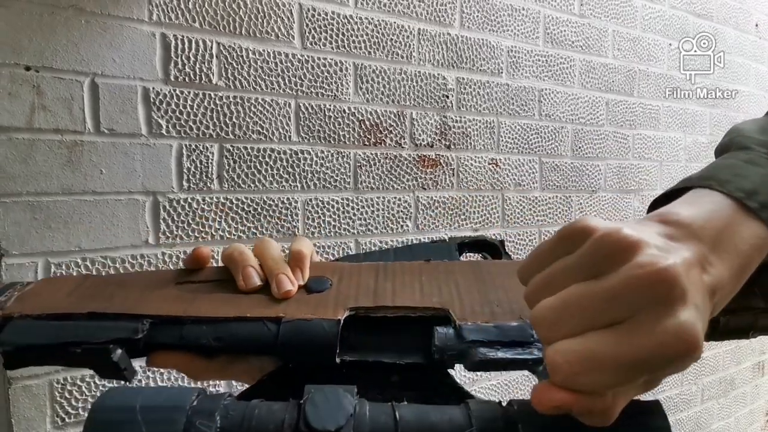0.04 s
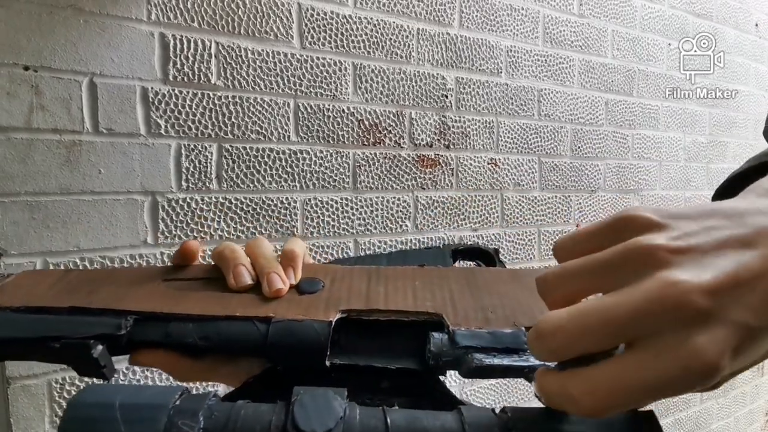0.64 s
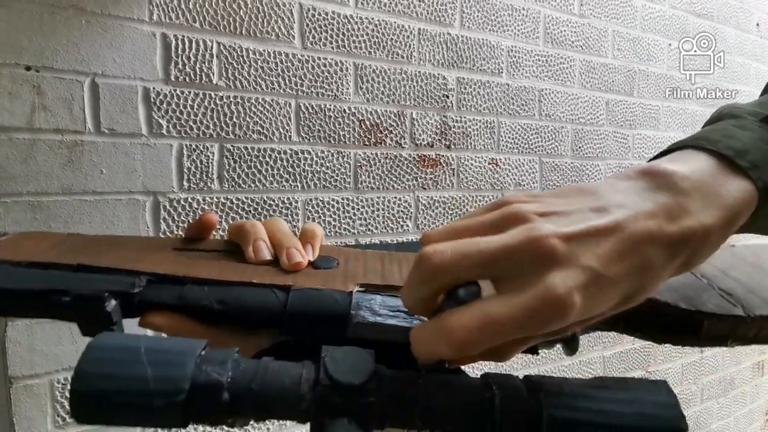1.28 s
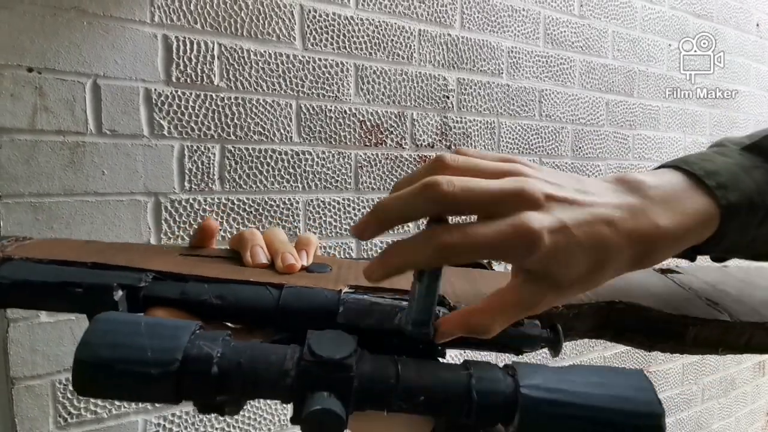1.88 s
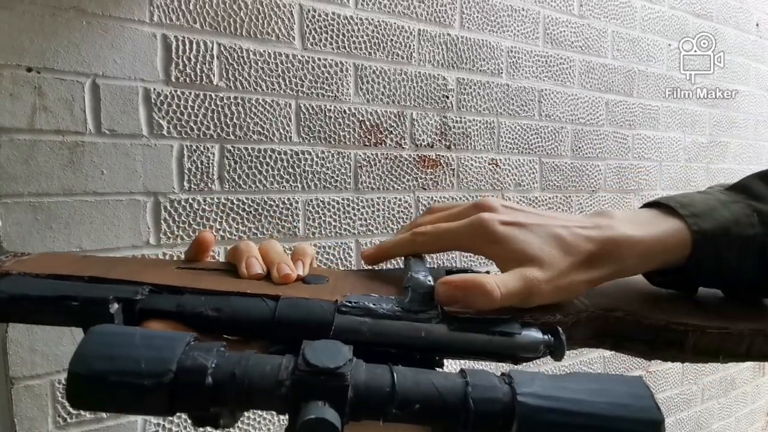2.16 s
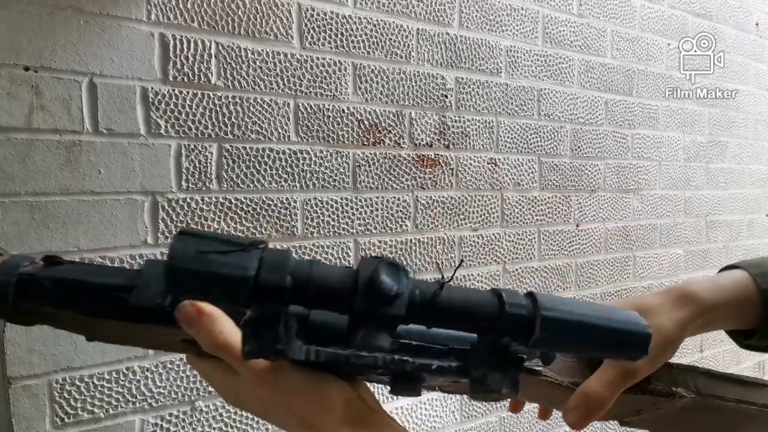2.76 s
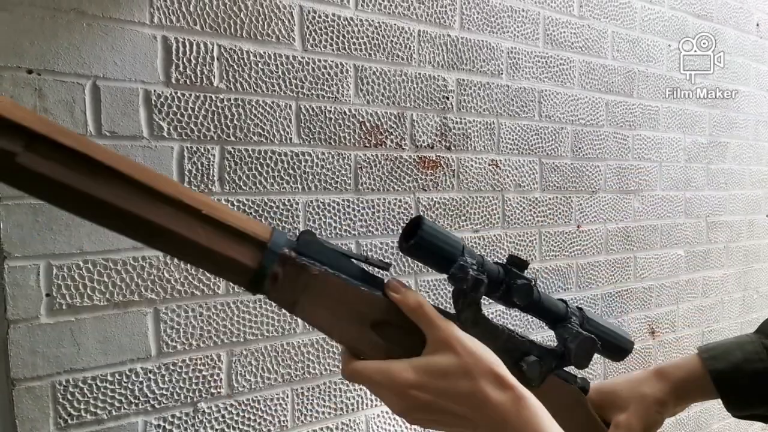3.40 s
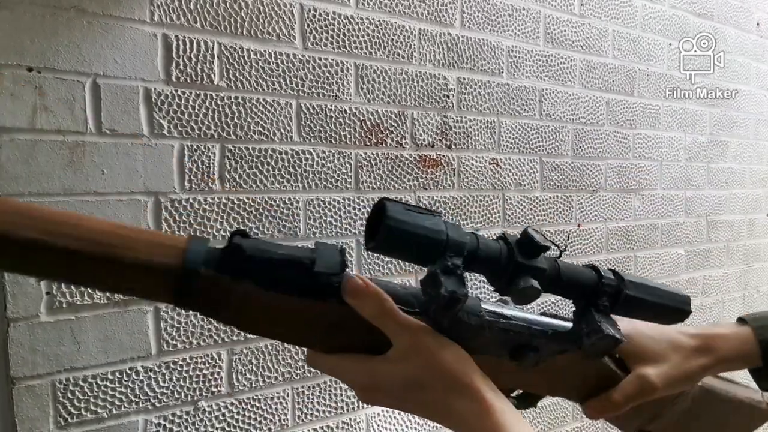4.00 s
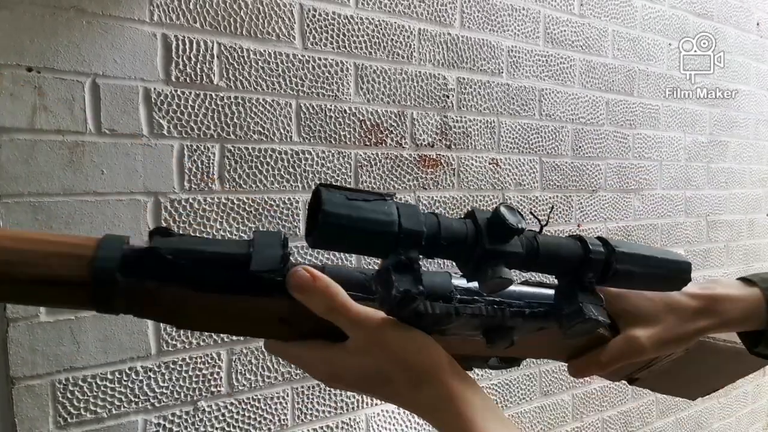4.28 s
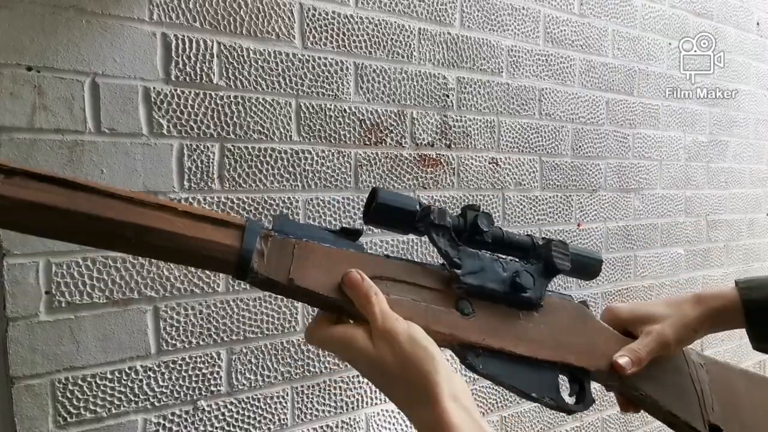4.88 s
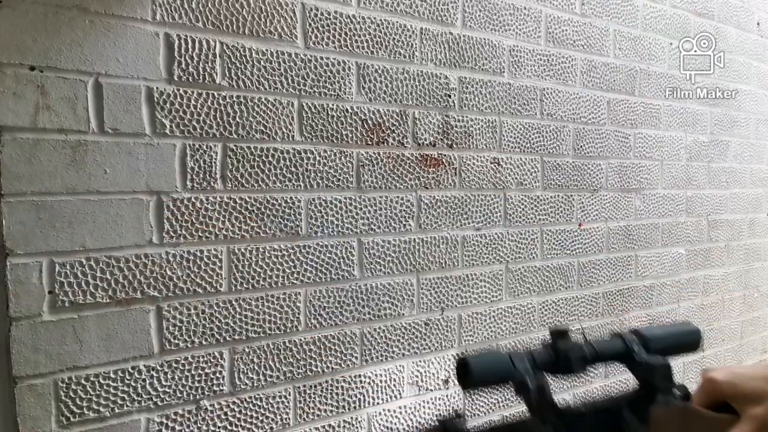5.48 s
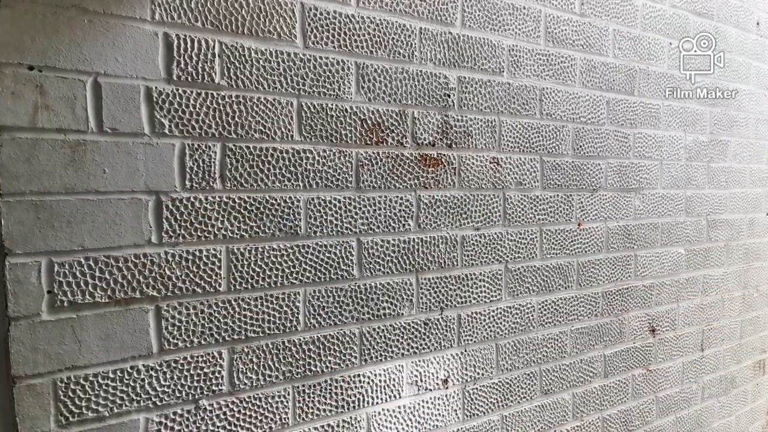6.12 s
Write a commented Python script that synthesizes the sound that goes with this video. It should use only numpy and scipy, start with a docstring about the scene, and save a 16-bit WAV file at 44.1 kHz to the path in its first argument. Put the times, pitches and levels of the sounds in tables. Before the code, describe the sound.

A cardboard rifle's bolt scrapes and taps close by, with low air thumps, followed by hands sliding on card and sleeves rustling.

```python
"""Handling a cardboard rifle

A prop rifle is handled close to a camera, beside a brick wall that scatters its sound. The bolt, a
card tube, scrapes to and fro by stick-slip friction, taps its stops and pushes puffs of air at the
left microphone port. Then the rifle is turned over: the card ticks, a palm slides along the stock
and jacket sleeves rustle. Each scrape and tap is coloured by the resonances of a card shell."""
import sys
import numpy as np
from scipy import signal
from scipy.fft import rfft, irfft, next_fast_len
from scipy.io import wavfile
from scipy.ndimage import uniform_filter1d

SR = 44100
rng = np.random.default_rng(int(sys.argv[2]) if len(sys.argv) > 2 else 0)


def dump_mix(stems):
    """Bounce the given channels to the path in sys.argv[1] as a 16-bit WAV at rate SR."""
    frames = np.atleast_2d(stems).T  # one column per channel
    limited = np.clip(frames, -1, 1)  # hard clip at full scale
    pcm = np.round(limited * 32767).astype(np.int16)
    wavfile.write(sys.argv[1], SR, pcm)


N = 275625
TIME = np.arange(N) / SR
AIR_DB, STROKE_DB, TOP_HZ = -72.3, 20, 15800

# Spectra of outdoor air, the draught and card friction: frequency_hz, relative_db
AIR_SPECTRUM = [(120, -6), (250, 2), (450, -3), (950, 0), (1800, -7.5), (2800, -2.5), (3500, -7.5),
                (4800, -8.5), (5400, -5), (6200, -17), (7600, -23.5), (11000, -18), (16000, -22)]
DRAUGHT_SPECTRUM = [(10, -19.5), (25, 3.5), (45, -0.5), (80, -9.5), (130, -18), (250, -26.5), (600, -52)]
CARD_SPECTRUM = [(60, -22), (200, -5), (480, -1.5), (1300, -2), (3200, -6.5), (3700, -7.5), (6500, -2.5),
                 (7800, -10), (11500, -7.5), (13500, -21.5), (16000, -23)]
# Spectrum of flapping cloth: frequency_hz, relative_db
CLOTH_SPECTRUM = [(20, -24), (60, 8.5), (130, -5.0), (350, -6.5), (600, -12.5), (1500, -43)]
# Stereo balance of the air and of friction: frequency_hz, left_minus_right_db
AIR_BALANCE = [(200, -1.5), (400, -10.5), (1000, 4.5), (2000, -4), (4400, 5), (5400, -0.5), (8000, -7),
               (15000, -5.5)]
FRICTION_BALANCE = [(200, -2), (750, 0), (1100, -6.5), (1400, 2), (2400, -8.5), (4400, -1), (6000, -11),
                    (8000, -21.5), (15000, -1.5)]
# Earlier arrival at the left port: frequency_hz, lead_s
LEFT_LEAD = [(900, 0.00004), (2000, 0.00031), (4000, 0.0003924)]
# Decay of sound scattered by the wall: frequency_hz, t60_s
WALL_DECAY = [(200, 0.69), (2000, 0.15), (10000, 0.3)]

# Resonances of the stock, its neck, the bolt handle and the tube: centre_hz, half_width_hz, lift_db
STOCK_MODES = [(1050, 110, 2.5), (1480, 110, 3), (2170, 180, 3), (2900, 320, 3.5), (4870, 640, 3),
               (10200, 630, 0.5)]
NECK_MODES = [(400, 130, 6), (1960, 280, 4), (3380, 1030, 6.5), (5340, 1060, 6), (10600, 640, 1)]
HANDLE_MODES = [(633, 56, 11), (1060, 120, 8), (2530, 640, 9.5), (4010, 540, 9), (5950, 1030, 8),
                (11800, 2500, 1)]
TUBE_MODES = [(500, 43, 3.5), (748, 52, 11.5), (940, 71, 12.5), (1070, 34, 6.5), (1500, 250, 2),
              (2100, 190, 4), (2670, 340, 6), (4050, 230, 5), (5740, 1000, 3), (11200, 190, 2.5)]

# Arm swings that flap loose cloth: full_speed_s, rise_s, hold_s, release_s, relative_db
ARM_SWINGS = [(2.96, 0.14, 0.025, 0.23, -61), (3.408, 0.7, 0.12, 0.21, -59),
              (5.818, 0.16, 0.017, 0.11, -57)]
# Air puffs on the left port, ahead of the low cut: centre_s, peak_db, pitch_hz
AIR_PUFFS = [(0.378, -36.5, 46.7), (0.852, -34, 44.3), (1.342, -39, 44.5), (1.371, -34, 45.6),
             (1.408, -32, 173), (1.4146, -12, 127), (1.441, -25, 68.4), (1.4835, -13.5, 126),
             (2.3677, -38.5, 128), (5.655, -37.5, 75)]
# Soft bumps of hand and cloth, and snaps of stiff card:
# start_s, source_peak_db, left_minus_right_db, pitch_hz, rise_cycles
SOFT_BUMPS = [(.367, -56.5, 14.5, 248, 0.24), (.841, -59, 16, 170, 0.24), (5.643, -52, -1, 245, 0.26),
              (5.818, -50.5, -10, 227, 0.29), (5.832, -51, -1, 277, 0.45), (5.847, -54, 0, 224, 0.44)]
CARD_SNAPS = [(.5103, -42.5, -7, 4100, 1.9), (1.4783, -22, -20, 3100, 0.28),
              (2.7073, -39.5, -13, 6050, 1.14), (3.3203, -22, -19.5, 3360, 0.41),
              (4.8134, -31.5, -3, 4770, 1), (5.5003, -45, -5, 2900, 4.5), (5.532, -40, -5, 5330, 1.6)]
# Impacts of card on card: start_s, source_peak_db, left_minus_right_db, tilt_db_per_octave
CARD_TAPS = [(0.246, -42, -1, -5.5), (0.5185, -48, 0, -10), (0.5496, -41, -3, 5.5),
             (0.611, -49.5, -6, -2.5), (0.794, -39, 3, 6), (1.4037, -36, 12, -2), (1.472, -36, 5, -9),
             (1.481, -25, 1, -9.5), (1.9244, -51, -10, -6), (1.9697, -27.5, -25, 1),
             (1.9868, -30.5, -2, -2.5), (1.9923, -43, -2, -4.5), (2.0152, -36.5, -6, -10),
             (2.1276, -50, -12, 5), (3.3206, -44, -15, -22), (4.812, -36.5, -10, 2.5), (5.041, -38, 11, -1),
             (5.6425, -47.5, -16, 15)]
# Sliding contacts of sleeves, palm, shifting grip, fingers and bolt:
# full_speed_s, rise_s, hold_s, release_s, scrape_db, hollow_over_scrape_db, fizz_over_scrape_db
SLEEVE_STROKES = [(5.55, 0.13, 0.11, 0.095, -68, -2.5, 0.5), (5.825, 0.26, 0.011, 0.059, -75.5, 9.5, -3),
                  (5.955, 0.16, .015, 0.12, -60.5, -3.5, -3)]
PALM_STROKES = [(4.815, 0.031, 0.004, 0.083, -53, -4.5, -8.5), (4.895, 0.072, 0.026, .1, -65, -5, 3.5),
                (4.97, 0.13, 0.015, 0.087, -56, -5, -1), (5.04, 0.11, 0.025, 0.1, -53.5, -7, -4.5)]
GRIP_STROKES = [(2.71, 0.012, .015, 0.09, -76, 0, 11), (2.995, 0.067, 0.0082, 0.13, -59.5, -9, -10.5),
                (3.08, 0.16, 0.044, 0.35, -66, -4, -1), (3.35, 0.27, 0.059, 0.19, -69, -1, -9.5)]
FINGER_STROKES = [(.518, 0.021, 0.018, 0.067, -75, 14, 13.5), (.555, 0.013, 0.028, 0.21, -59.5, -2.5, 3.5),
                  (.725, .15, 0.084, 0.067, -62, -1, 3.5), (.857, 0.029, 0.0027, .05, -80.5, 17, -5)]
BOLT_STROKES = [(.04, 0.13, 0.071, 0.057, -57.5, 1, -4.5), (.245, 0.13, 0.021, 0.076, -66.5, 6.5, -5.5),
                (1.01, 0.04, 0.25, 0.23, -70.5, 1, -4), (1.22, 0.31, 0.018, 0.057, -61.5, 1, -8.5),
                (1.39, 0.12, 0.11, 0.097, -51, 0, -2), (1.68, 0.1, 0.0074, .1, -77.5, 10.5, 3.5),
                (1.99, 0.024, .01, 0.19, -54.5, -0.5, -8.5), (2.11, 0.18, .02, .15, -60, 1.5, -3),
                (2.225, 0.11, 0.041, 0.13, -54, -4, -4), (2.31, 0.069, 0.031, 0.078, -56.5, 3, -2)]


def amp(db):
    """Amplitude ratio of a level in decibels."""
    return 10 ** (np.asarray(db) / 20)


def unit_rms(x):
    """Normalisation to an rms of 1."""
    return x / np.sqrt(np.mean(x ** 2) + 1e-20)


def curve_at(points, hz):
    """Interpolation on a logarithmic frequency axis."""
    knots_hz, values = np.transpose(points)
    return np.interp(np.log(hz + 1), np.log(knots_hz + 1), values)


def wobble(rate_hz):
    """Slow random modulation: straight lines between Gaussian knots."""
    knots = rng.standard_normal(int(N * rate_hz / SR) + 2)
    return np.interp(TIME * rate_hz, np.arange(len(knots)), knots)


def filtered(x, response):
    """Linear filtering: the spectrum is multiplied by a frequency response."""
    size = x.shape[-1]
    padded = next_fast_len(size + 8192)
    return irfft(rfft(x, padded) * response(np.fft.rfftfreq(padded, 1 / SR)), padded)[..., :size]


def panned(pan_db):
    """Level difference between the ports, as left and right gains whose mean is 1."""
    left = amp(np.atleast_1d(pan_db))
    return 2 * np.array([left, np.ones_like(left)]) / (1 + left)


def add(track, start_s, sound):
    """Superposition of a sound on a track."""
    room = track[..., round(start_s * SR):][..., :sound.shape[-1]]
    room += sound[..., :room.shape[-1]]


def gesture(t, full_speed_s, rise_s, hold_s, release_s):
    """Exponential envelope: up by STROKE_DB over the rise, steady, down as much over the release."""
    before = np.maximum(full_speed_s - t, 0) / rise_s
    after = np.maximum(t - full_speed_s - hold_s, 0) / release_s
    return amp(-STROKE_DB * (before + after))


def port_delay(hz):
    """Time difference of arrival: direct sound reaches the left port first."""
    return np.exp(1j * np.pi * hz * curve_at(LEFT_LEAD, hz) * np.array([[1], [-1]]))


def with_scatter(sound, wet_db):
    """Diffuse reflection: the prop and the wall add a decaying tail to the direct sound."""
    hz, t, noise = signal.stft(rng.standard_normal((2, SR // 5)), SR, nperseg=256)
    decay = amp(-60 * t / curve_at(WALL_DECAY, hz)[:, None]) + 1.8 * amp(-60 * t / 0.052)
    tail = signal.istft(noise * decay, SR, nperseg=256)[1]
    out = amp(wet_db) * signal.fftconvolve(sound, tail / np.linalg.norm(tail[0]), axes=1)
    add(out, 0, filtered(sound, port_delay))
    return out


def shell_db(modes, hz):
    """Resonance: each mode of a shell lifts one band of the card's friction spectrum."""
    lifts_db = sum(lift / (1 + ((hz - centre) / width) ** 4) for centre, width, lift in modes)
    return curve_at(CARD_SPECTRUM, hz) + lifts_db


def shell_impulse(modes, tilt_db, size=2048):
    """Minimum-phase impulse response of a card shell, from its folded cepstrum."""
    hz = np.fft.rfftfreq(size, 1 / SR)
    softness = 1 / (1 + (hz / 11000) ** 4)  # card gives way, which blunts a contact
    magnitude = softness * amp(shell_db(modes, hz) + tilt_db * np.log2(1 + hz / 500))
    cepstrum = irfft(np.log(magnitude))
    cepstrum[1:size // 2] *= 2
    cepstrum[size // 2 + 1:] = 0
    return irfft(np.exp(rfft(cepstrum)))


def outdoor_air(left_db=-56, right_db=-67):
    """Coloured noise: quiet air hisses, and a draught rumbles unevenly, mostly on the left port."""
    hiss = filtered(rng.standard_normal((2, N)),
                    lambda hz: amp(curve_at(AIR_SPECTRUM, hz)) * panned(curve_at(AIR_BALANCE, hz)))
    rumble = filtered(rng.standard_normal((2, N)), lambda hz: amp(curve_at(DRAUGHT_SPECTRUM, hz)))
    draught = unit_rms(rumble) * amp(3.9 * wobble(rate_hz=9)) * amp([[left_db], [right_db]])
    return amp(AIR_DB) * hiss / np.std(hiss.mean(axis=0)) + draught


def cloth_flutter(gain_db=-2, pan_db=-3):
    """Amplitude-modulated noise: loose cloth flaps dully with each swing of the arms."""
    swing = sum(amp(db) * gesture(TIME, *timing) for *timing, db in ARM_SWINGS)
    noise = rng.standard_normal(N) + 0.33 * rng.standard_normal((2, N))  # mostly common to both ports
    cloth = unit_rms(filtered(noise, lambda hz: amp(curve_at(CLOTH_SPECTRUM, hz))))
    return cloth * swing * amp(gain_db + wobble(rate_hz=25)) * panned(pan_db)


def air_puffs(low_cut_hz=42, damping=0.53, right_db=-34):
    """Bipolar pressure pulses suck, then push on the left port; the microphone's low cut rings on."""
    pressure, t = np.zeros(N), np.arange(-2048, 2048) / SR
    for centre_s, db, hz in AIR_PUFFS:
        phase = 2 * np.pi * hz * t
        add(pressure, centre_s + t[0], amp(db) * phase * np.exp((1 - phase ** 2) / 2))
    low_cut = lambda f: -f * f / (low_cut_hz ** 2 - f * f + 1j * damping * f * low_cut_hz)
    return filtered(pressure, low_cut) * amp([[0], [right_db]])


def patch_flips(flips, grit, wet_db):
    """Damped oscillation: a small patch of card or cloth flips and rings for a few cycles."""
    out, t = np.zeros((2, N)), np.arange(SR // 16) / SR
    for start_s, db, pan_db, hz, rise_cycles in flips:
        age = hz * t / rise_cycles
        roughness = filtered(rng.standard_normal(len(t)), lambda f: 1 / (1 + (f / (2.23 * hz)) ** 4))
        crunch = grit * rise_cycles * unit_rms(roughness)  # a longer flip crunches more
        pop = (np.sin(2 * np.pi * hz * t) + crunch) * age * np.exp(1 - age)
        # a small patch radiates little below its own pitch
        pop = signal.lfilter(*signal.butter(2, hz / 2, "highpass", fs=SR), pop)
        add(out, start_s, with_scatter(amp(db) * panned(pan_db) * pop / np.abs(pop).max(), wet_db))
    return out


def card_taps(crunch_t60_s=0.008, rattle_db=-18, rattle_t60_s=0.073, wet_db=-7):
    """Impact excitation: a brief crunch and a faint rattle drive the modes of the tube."""
    out, t = np.zeros((2, N)), np.arange(SR // 16) / SR
    envelope = amp(-60 * t / crunch_t60_s) + amp(rattle_db - 60 * t / rattle_t60_s)
    for start_s, db, pan_db, tilt_db in CARD_TAPS:
        force = rng.standard_normal(len(t)) * envelope
        tap = signal.fftconvolve(force, shell_impulse(TUBE_MODES, tilt_db))
        add(out, start_s, with_scatter(amp(db) * panned(pan_db) * tap / np.abs(tap).max(), wet_db))
    return out


def friction(strokes, modes, slips_hz, spread_db, patchy_db, pan_db, wet_db, size=512):
    """Stick-slip friction: fibres catch and slip in dense, uneven ticks that ring a card shell."""
    start_s, end_s = max(round(strokes[0][0] - .4, 1), 0), round(strokes[-1][0] + .6, 1)
    span = slice(round(start_s * SR), round(end_s * SR))
    slipping = rng.random(N)[span] < slips_hz / SR
    force, spread = rng.standard_normal((2, N))[:, span]
    scatter = rng.standard_normal((2, N))[:, span]
    slips = unit_rms(slipping * force * amp(spread_db * np.clip(spread, -2, 2)))
    frames = dict(nperseg=size, noverlap=size * 3 // 4)
    hz, t, spectra = signal.stft(np.vstack([slips, scatter]), SR, **frames)
    scrape = spectra[0] * port_delay(hz)[..., None] + amp(wet_db) * spectra[1:]
    scrape *= (amp(shell_db(modes, hz)) * panned(curve_at(FRICTION_BALANCE, hz) + pan_db))[..., None]
    # the contact point travels, so the resonances are fed unevenly
    patches = rng.standard_normal((len(hz), 3 * size))[:, :len(t)]
    patches = uniform_filter1d(uniform_filter1d(patches, size=3, axis=0), size=14, axis=1)
    depth_db = patchy_db / (1 + hz[:, None] / 5000)  # the fine fizz stays more even
    scrape *= amp(depth_db * unit_rms(patches))
    # the grip of each stroke weights three bands: mid scrape, low hollow ring and high fizz
    hollow = 1 / (1 + (hz / 1400) ** 10)
    fizz = 1 - 1 / (1 + (hz / 4000) ** 10)
    bands = [1 - hollow - fizz, hollow, fizz]
    stroke_levels = [np.outer(amp([db, db + hollow_db, db + fizz_db]), gesture(start_s + t, *timing))
                     for *timing, db, hollow_db, fizz_db in strokes]
    levels = np.sqrt(sum(level ** 2 for level in stroke_levels))  # strokes add in power
    power = np.mean(abs(scrape.mean(axis=0)) ** 2, axis=1) * 4 / 3  # one-sided, Hann window
    gain = sum(np.outer(band, level) / np.sqrt(power @ band ** 2) for band, level in zip(bands, levels))
    out = np.zeros((2, N))
    add(out, start_s, signal.istft(scrape * gain, SR, **frames)[1])
    return out


def sleeve_rustle():
    """Cloth friction: sleeves brush the hollow stock and excite its modes."""
    return friction(SLEEVE_STROKES, STOCK_MODES,
                    slips_hz=6900, spread_db=3, patchy_db=6, pan_db=-3.5, wet_db=3)


def hand_rubs():
    """Skin friction: fingers slip on the bolt handle, the grip shifts, a palm slides on the stock."""
    fingers = friction(FINGER_STROKES, HANDLE_MODES,
                       slips_hz=2730, spread_db=0.5, patchy_db=4.5, pan_db=0.5, wet_db=0)
    grip = friction(GRIP_STROKES, NECK_MODES,
                    slips_hz=5270, spread_db=3.5, patchy_db=2.5, pan_db=-4.5, wet_db=2)
    palm = friction(PALM_STROKES, STOCK_MODES,
                    slips_hz=2480, spread_db=-1.5, patchy_db=5, pan_db=-0.5, wet_db=2)
    return fingers + grip + palm


def bolt_scrape():
    """Friction of card on card: the sliding bolt excites the modes of its tube."""
    return friction(BOLT_STROKES, TUBE_MODES,
                    slips_hz=4040, spread_db=1, patchy_db=2, pan_db=-0.5, wet_db=-2)


def scene():
    """Superposition of the handling sounds and the outdoor air."""
    sliding = bolt_scrape() + hand_rubs() + sleeve_rustle()
    snaps = patch_flips(CARD_SNAPS, grit=0.33, wet_db=-19.5)
    bumps = patch_flips(SOFT_BUMPS, grit=1.0, wet_db=-2)
    return sliding + snaps + bumps + card_taps() + air_puffs() + cloth_flutter() + outdoor_air()


def record(dry):
    """Band limiting: the camera passes nothing above TOP_HZ."""
    return filtered(dry, lambda hz: hz < TOP_HZ)


dry = scene()
out = record(dry)
dump_mix(out)
```